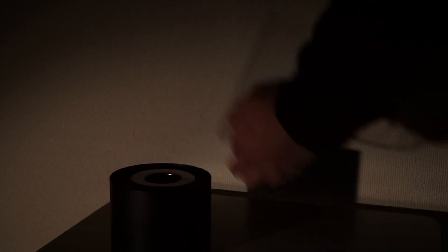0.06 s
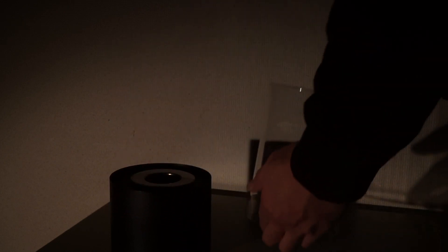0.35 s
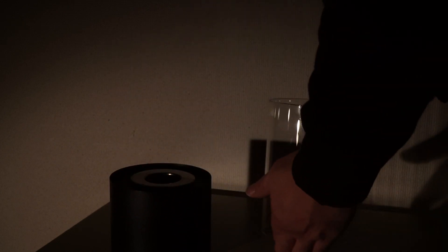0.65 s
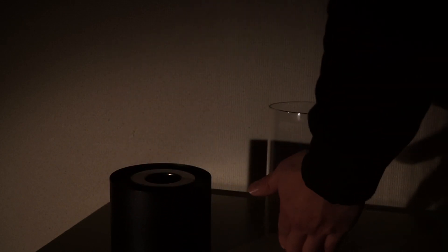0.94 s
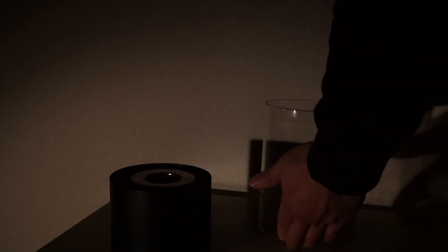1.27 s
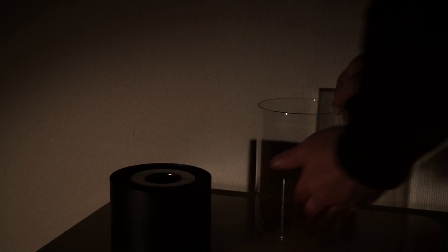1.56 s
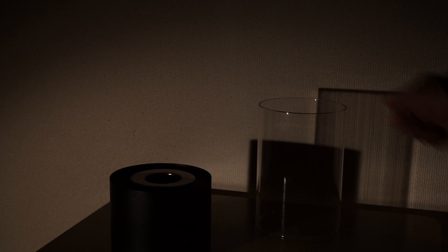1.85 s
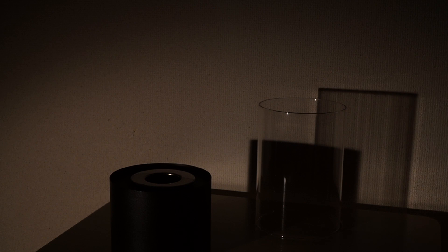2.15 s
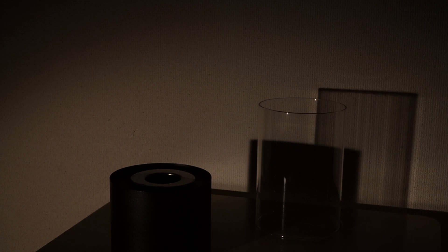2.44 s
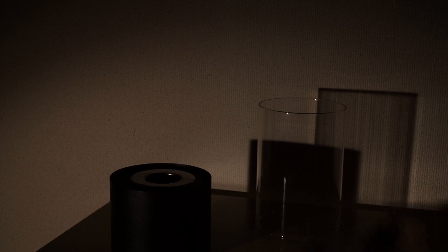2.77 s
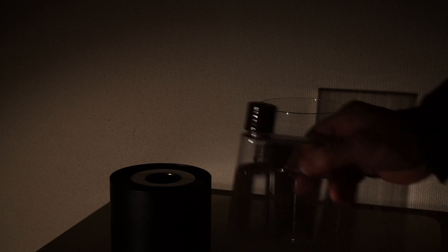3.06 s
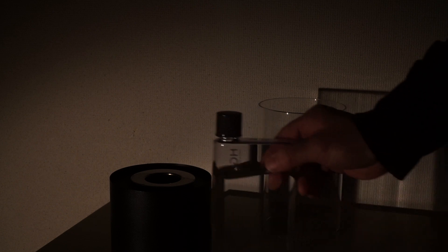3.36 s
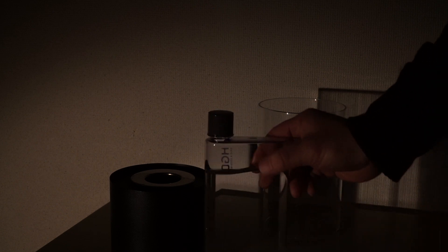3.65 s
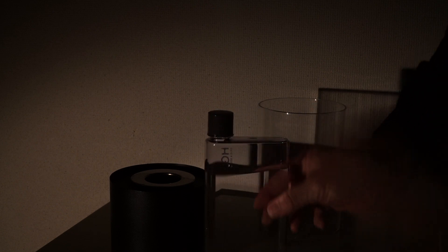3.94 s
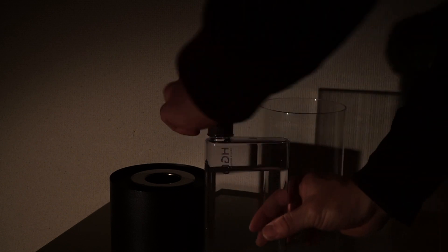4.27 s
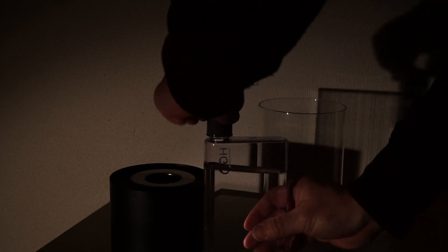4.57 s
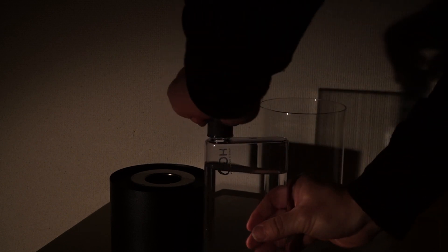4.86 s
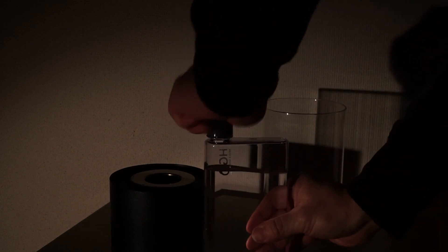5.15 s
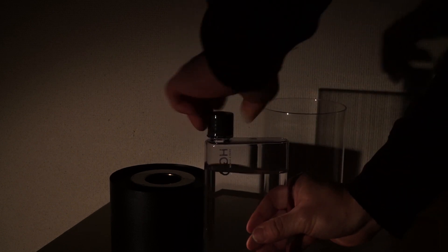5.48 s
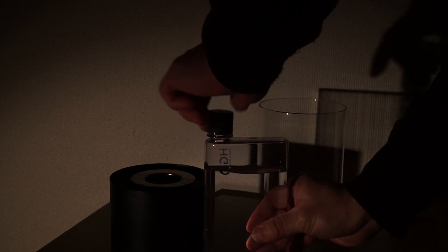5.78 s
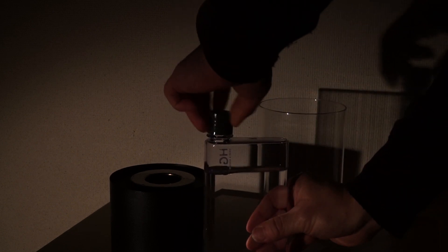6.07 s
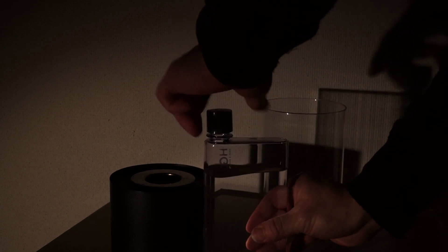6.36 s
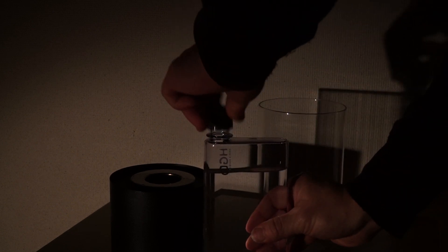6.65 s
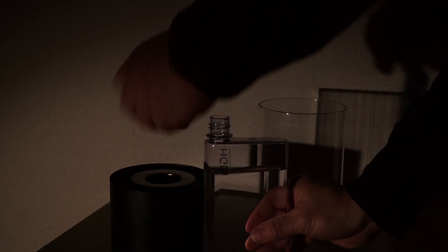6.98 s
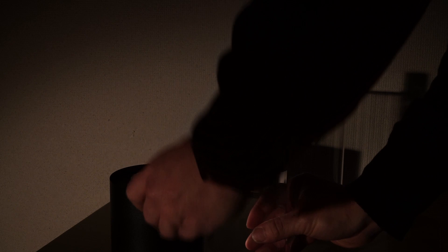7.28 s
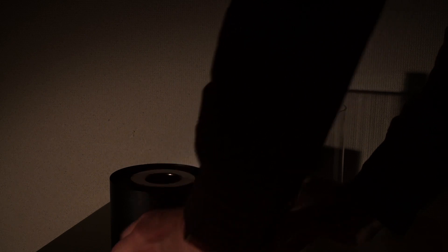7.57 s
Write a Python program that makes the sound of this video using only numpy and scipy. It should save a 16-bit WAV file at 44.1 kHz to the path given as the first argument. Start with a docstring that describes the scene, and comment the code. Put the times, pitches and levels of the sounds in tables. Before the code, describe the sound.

A glass is set on a table with sharp knocks, then a plastic bottle lands and its cap is cracked and unscrewed.

```python
"""A low hum fills a small room. A glass cylinder is set on a table in two knocks, its rim dragging
in between, and its thin wall sings faintly. A sleeve rustles, then a flat plastic bottle of liquid
is put beside the glass and rocks to rest. Fingers touch the cap, and the seal creaks and cracks.
Last, the cap is unscrewed in three rasping turns as its thread catches and slips."""
import sys
import numpy as np
from scipy import signal
from scipy.fft import rfft, irfft, next_fast_len
from scipy.io import wavfile
from scipy.ndimage import uniform_filter1d

SR = 44100
rng = np.random.default_rng(int(sys.argv[2]) if len(sys.argv) > 2 else 0)


def dump_mix(stems):
    """Bounce the given channels to the path in sys.argv[1] as a 16-bit WAV at rate SR."""
    frames = np.atleast_2d(stems).T  # one column per channel
    limited = np.clip(frames, -1, 1)  # hard clip at full scale
    pcm = np.round(limited * 32767).astype(np.int16)
    wavfile.write(sys.argv[1], SR, pcm)


N = 336042
TIME = np.arange(N) / SR
RESPONSE_SIZE = 2 ** 15
RESPONSE_HZ = np.fft.rfftfreq(RESPONSE_SIZE, 1 / SR)


def from_db(db):
    return 10 ** (np.asarray(db) / 20)


def unit_energy(x):
    return x / np.sqrt(np.sum(x ** 2))


def at_hz(points, hz):
    """Read between the rows of an (f/Hz, value) table, with octaves evenly spaced."""
    f, value = np.transpose(points)
    return np.interp(np.log(np.maximum(hz, 1)), np.log(f), value)


def left_right(mid, side):
    """Mid is what both ears share; side is how they differ."""
    return np.array([mid + side, mid - side])


def add(track, s, sound):
    """Mix a sound into a track from a given time on."""
    start = round(s * SR)
    track[start:start + len(sound)] += sound[:N - start]


def convolve(x, response):
    """Play a signal through an object or a room."""
    return signal.oaconvolve(np.atleast_2d(x), np.atleast_2d(response), axes=1)[:, :N]


def soften(force, hardness_hz):
    """A softer contact lasts longer and loses its treble above hardness_hz."""
    r = np.exp(-2 * np.pi * hardness_hz / SR)
    return signal.lfilter([(1 - r) ** 2], [1, -2 * r, r * r], force)


def blows(rows):
    """One short push for each contact."""
    force = np.zeros(N)
    for s, db, hardness_hz in rows:
        add(force, s, from_db(db) * soften(signal.unit_impulse(SR // 20), hardness_hz))
    return force


def rubs(rows, slips_per_s, uneven_db, fade_db=0):
    """Rubbing is a run of tiny uneven slips that may fade; its level counts all the slips together."""
    slipping = rng.random(N) < slips_per_s / SR
    slips = slipping * from_db(uneven_db * rng.uniform(-1.3, 1, N)) * rng.choice([-1, 1], N)
    force = np.zeros(N)
    for start, end, db, hardness_hz in rows:
        run = slips[round(start * SR):round(max(end, start + .01) * SR)] + 1e-9
        shape = signal.windows.tukey(len(run), .3) * from_db(np.linspace(0, -fade_db, len(run)))
        add(force, start, from_db(db) * soften(unit_energy(run * shape), hardness_hz))
    return force


def landing(event, edge_lead_s, rock_s, loss_db, far_edge_db, softer, count):
    """An edge touches, the base drops flat, then it rocks from edge to edge and settles."""
    s, db, hardness_hz = event
    edge = (s - edge_lead_s, db - 10.5, hardness_hz * 1.2)   # lighter and sharper than the base
    rocks = [(s + k * rock_s, db - k * loss_db + far_edge_db * (k % 2), hardness_hz * softer ** k)
             for k in range(count)]
    return blows([edge] + rocks)


def body(colour, notes):
    """How an object answers one tap: a broad tone colour with its own ringing notes on top."""
    f = RESPONSE_HZ
    cepstrum = irfft(np.log(from_db(at_hz(colour, f))))
    cepstrum[1:] *= 2 * (np.arange(1, RESPONSE_SIZE) < RESPONSE_SIZE // 2)   # no sound before the tap
    peaks = 1
    for hz, width, db in notes:
        # every note dies away quickly, so knocks and clicks sound short and dry
        width = max(width, hz / 55)
        peaks = peaks + (from_db(db) - 1) * 1j * f * width / (hz ** 2 - f ** 2 + 1j * f * width)
    return irfft(np.exp(rfft(cepstrum)) * peaks)


def noise(colour, side_colour):
    """Steady stereo noise, scaled by its strength above the bass."""
    size = next_fast_len(N, True)
    hz = np.fft.rfftfreq(size, 1 / SR)
    gain = from_db(at_hz(colour, hz))
    gain = gain / np.sqrt(np.mean(gain ** 2 * (hz > 300)))
    mid, side = rfft(rng.standard_normal((2, size))) * gain
    side = side * from_db(at_hz(side_colour, hz))
    return left_right(irfft(mid)[:N], irfft(side)[:N])


# tone colour of the room's hiss, and its side compared with its mid: f/Hz, level/dB
AIR_COLOUR = [(11, -40.5), (18, -26), (27, -14), (42, -8.5), (64, -6), (114, -5.5), (155, -20.5),
              (245, -21.5), (431, -26.5), (511, -27.5), (698, -30), (1070, -32.5), (1880, -34), (5690, -39),
              (15800, -43)]
AIR_SIDE = [(60, -38), (150, -9.5), (380, 0), (950, 3.5), (2380, 1.5), (5980, -0.5), (15000, -3)]
# the hum's tones: f/Hz, level/dB
HUM_TONES = [(59.2, -63), (80.7, -65.5), (107.7, -70), (129.2, -72.5)]
# how quickly each tone wavers: f/Hz
HUM_WAVER_HZ = [3, 15, 3.1, 3]

def room_hum():
    """Even hiss and a few low, wavering tones."""
    out = from_db(-63.5) * noise(AIR_COLOUR, AIR_SIDE)
    for (hz, db), waver_hz in zip(HUM_TONES, HUM_WAVER_HZ):
        drifts = rng.normal(0, 0.34, size=(2, 200))
        swell, phase = [np.interp(TIME * waver_hz, np.arange(len(d)), d) for d in drifts]
        out = out + np.sqrt(2) * from_db(db) * (1 + swell) * np.sin(2 * np.pi * (hz * TIME + phase))
    return out


# the glass's single knocks, and its base dropping flat: t/s, relative level/dB, hardness f/Hz
GLASS_KNOCKS = [(0.9645, -43, 2600), (1.1666, -9.5, 1210), (1.73, -37, 260)]
GLASS_LANDING = (1.5212, 0, 2040)
# its rim dragging: start t/s, end t/s, relative level/dB, hardness f/Hz
RIM_DRAGS = [(1.24, 1.48, -19.5, 289), (1.482, 1.516, -13, 476), (1.70, 1.75, -26.5, 423)]
# tone colour of glass on the table: f/Hz, level/dB
GLASS_COLOUR = [(40, -22), (70, -6), (110, -4), (150, 2), (175, -18.5), (202, 1.5), (250, 3), (330, 4.5),
                (470, 5.5), (700, 0), (1000, -6), (1500, -7), (2400, -11), (3800, -12.5), (6000, -19),
                (15000, -28)]
# notes the table rings with, under glass and bottle alike: f/Hz, least width/Hz, boost/dB
TABLE_NOTES = [(226, 33, 12), (287, 16, 5.5), (311, 27, 6.5), (356, 48, 2.5), (407.4, 16, 6.5),
               (541, 90, 6.5), (667, 6.2, 13.5), (710, 45, 10.5), (777, 32.8, 6), (908.5, 47, 13),
               (1086, 10, 0.5), (1138, 43, 19), (1216, 18, 11.5), (1332, 27.9, 3.5), (1515, 10, 2.5),
               (1578, 33, -1), (1648, 56, 11.5), (1853, 55, 11.5), (1830, 64, 8.5), (1990, 46, 14.5),
               (2039, 28, -8), (2370, 49, 9.5), (2330, 90, 9)]
TABLE_TOP_NOTE, RIM_NOTE = (233.3, 7.3, 14), (295, 25, 10)

def glass():
    """One edge lands, the rim sings as it drags, then the whole base drops flat."""
    force = blows(GLASS_KNOCKS) + landing(GLASS_LANDING, edge_lead_s=0.00223, rock_s=0.0112,
                                          loss_db=7.5, far_edge_db=2, softer=0.99, count=4)
    knocks = convolve(force, body(GLASS_COLOUR, [*TABLE_NOTES, TABLE_TOP_NOTE]))
    friction = rubs(RIM_DRAGS, slips_per_s=830, uneven_db=2.5)
    drag = convolve(friction, body(GLASS_COLOUR, [*TABLE_NOTES, RIM_NOTE]))
    return from_db(21) * (knocks + drag)


def ring(hz, db, fade_s):
    """One freely ringing note that drops 60 dB in fade_s."""
    t = TIME[:2 * SR]
    return from_db(db - 60 * t / fade_s) * np.sin(2 * np.pi * hz * t)


# fingers slipping on the glass: start t/s, end t/s, relative level/dB, hardness f/Hz
FINGER_SLIPS = [(1.475, 1.51, -54.5, 12000), (1.71, 1.76, -56, 12400)]
# high notes of the glass wall: f/Hz, relative level/dB, fade t/s
TINKLE_NOTES = [(2156, 3.5, 0.11), (3560, -1, 0.08), (4080, -8, 0.13), (5750, 1, 0.08)]

def glass_wall():
    """The thin wall tinkles under slipping fingers and sings faintly after the landing."""
    skin = rubs(FINGER_SLIPS, slips_per_s=780, uneven_db=8)
    tinkle = convolve(skin, sum(ring(*note) for note in TINKLE_NOTES))
    singing = np.zeros(N)
    for hz in (440, 440.65):   # the wall's lowest note is a close pair, so it slowly throbs
        add(singing, GLASS_LANDING[0], ring(hz, db=-54, fade_s=3.5) / 2)
    return singing + tinkle + from_db(18) * soften(skin, hardness_hz=6100)


def swells(rows):
    """A smooth rise and fall of level for each movement."""
    bumps = (from_db(db) * np.exp(-((TIME - s) / half_s) ** 2 / 2) for s, db, half_s in rows)
    return np.sqrt(sum(bump ** 2 for bump in bumps))


# slow arm movements, then two brief bright swishes: middle t/s, relative level/dB, half length t/s
ARM_MOVES = [(1.95, -65.5, 0.57), (2.55, -59, 0.18), (3.6, -62.5, 0.24), (4.22, -62, 0.33),
             (7.6, -66, 0.13)]
SWISHES = [(2.685, -60, 0.0062), (3.715, -55, 0.026)]
# tone colours of the brushing cloth and of the bright swishes: f/Hz, level/dB
SLEEVE_COLOUR = [(300, -2.5), (1000, 6.5), (2500, 10.5), (6000, 5.5), (12000, 3.5), (16000, -0.5)]
SWISH_COLOUR = [(500, -4), (2500, 4), (6000, -1), (9000, -1), (12500, 5), (16000, 1)]
# side compared with mid, for the cloth and also the room's echoes: f/Hz, level/dB
ROOM_SIDE = [(125, -33), (250, -25), (500, -20), (1000, -14.5), (2000, -9), (4000, -5.5), (10000, -2.5)]

def sleeve():
    """Cloth hisses softly as the arm moves, and two brief bright swishes rise above it."""
    brush_level = np.hypot(from_db(-80.5), swells(ARM_MOVES))   # never quite still
    brush = brush_level * noise(SLEEVE_COLOUR, ROOM_SIDE)
    swish = swells(SWISHES) * noise(SWISH_COLOUR, ROOM_SIDE)
    return (brush + swish) * from_db([[-1.2], [1.2]])   # a little to the right


# the bottle's single knocks, and its base dropping flat: t/s, relative level/dB, hardness f/Hz
BOTTLE_KNOCKS = [(2.537, -32.5, 3630), (4.60, -27, 202), (4.80, -26, 188), (5.041, -20, 417),
                 (5.205, -20.5, 350)]
BOTTLE_LANDING = (3.366, 0, 1220)
# its base sliding: start t/s, end t/s, relative level/dB, hardness f/Hz
BOTTLE_SLIDES = [(3.47, 3.56, -11.5, 233), (3.5, 3.9, -31, 746)]
# tone colour of the bottle on the table: f/Hz, level/dB
BOTTLE_COLOUR = [(40, -30), (65, -3.5), (125, -5.5), (172, -16.5), (205, -3.5), (265, -4.5), (400, 3.5),
                 (800, -4.5), (1500, -6), (2000, -7), (2800, -8), (3700, -4.5), (6000, -13.5), (15000, -19)]

def bottle():
    """The bottle is picked up, rocks and slides to rest on the table and is nudged as it is gripped."""
    force = blows(BOTTLE_KNOCKS) + landing(BOTTLE_LANDING, edge_lead_s=0.0038, rock_s=0.0172,
                                           loss_db=3.5, far_edge_db=-9.5, softer=0.87, count=5)
    force += rubs(BOTTLE_SLIDES, slips_per_s=610, uneven_db=-3)
    bottle_note = (402, 19, 3)   # f/Hz, width/Hz, boost/dB
    response = body(BOTTLE_COLOUR, [*TABLE_NOTES, TABLE_TOP_NOTE, bottle_note])
    return from_db(21.5) * convolve(force, response)


SEAT_DELAY_S, SEAT_HARDNESS_HZ = 0.00397, 2180   # a dull knock follows each tick as the cap seats
# fingers touching the cap: t/s, relative level/dB, hardness f/Hz
CAP_TOUCHES = [(4.535, -39.5, 4000), (4.858, -44, 7000)]
# the thread catching and slipping: t/s, length t/s, tick level/dB, rasp level/dB, tick hardness f/Hz
CAP_SLIPS = [(5.7134, 0.025, -30.5, -34, 4600), (5.7544, 0.011, -24.5, -26, 4260),
             (5.815, 0.009, -24.5, -34, 2780), (5.8724, 0.035, -20.5, -14, 3500),
             (6.1873, 0.0083, -21.5, -31, 7650), (6.261, 0.089, -20.5, -35, 3620),
             (6.3492, 0.04, -23.5, -16.5, 5700), (6.616, 0.013, -27.5, -23.5, 4180),
             (6.686, 0.0216, -48, -29.5, 2400), (6.7403, 0.022, -29.5, -22, 3140),
             (6.7708, 0.025, -22, -23, 5400), (6.805, 0.039, -24.5, -22.5, 3900)]
# tone colour of the cap and the plastic shell: f/Hz, level/dB
CAP_COLOUR = [(80, 3.5), (130, -7.5), (220, -1), (330, -5), (600, -1), (850, -3), (1300, -0.5),
              (2000, -2.5), (2800, -8.5), (4300, -3), (6200, -16), (8200, -10), (10500, -21), (15000, -17)]
# notes the shell rings with: f/Hz, least width/Hz, boost/dB
SHELL_NOTES = [(390, 32, 14), (540, 10.4, 10.2), (694, 32, 14.5), (949, 10.3, 11.6), (1104, 11, 12.5),
               (1385, 65, 13.1), (1800, 30, 8.8), (1928, 55, 13.3), (2150, 65, 8.3), (2520, 21, 7.9),
               (2850, 110, 8.6), (3220, 34, 3.4), (3300, 140, 5.8), (4020, 48, 7.2), (8240, 1900, 4.9)]
# the hand's grips: start t/s, relative level/dB, the note left freest (f/Hz, width/Hz, boost/dB)
GRIPS = [(0, -1, (1320, 180, 6.4)), (6.1, -2, (1140, 230, 3.4)), (6.3, -0.13, (2670, 1470, 11.6)),
         (6.55, -1.9, (10000, 1400, 7))]

def cap():
    """Fingers tap, then the thread ticks, seats and rasps; each grip colours the shell differently."""
    ticks, rasps = list(CAP_TOUCHES), []
    for s, length_s, tick_db, rasp_db, hardness_hz in CAP_SLIPS:
        ticks += [(s, tick_db, hardness_hz), (s + SEAT_DELAY_S, tick_db - 11, SEAT_HARDNESS_HZ)]
        rasps.append((s, s + length_s, rasp_db, hardness_hz * 0.79))   # duller than its tick
    force = blows(ticks) + rubs(rasps, slips_per_s=450, uneven_db=8, fade_db=5)
    grip_now = np.searchsorted([s for s, db, note in GRIPS[1:]], TIME)
    shell = sum(from_db(db) * convolve(force * (grip_now == k), body(CAP_COLOUR, [*SHELL_NOTES, note]))
                for k, (s, db, note) in enumerate(GRIPS))
    return from_db(19) * shell


# the seal's snap: t/s, relative level/dB, hardness f/Hz
SEAL_CRACK = [(5.2025, -21, 11900)]
# notes the seal rings with: f/Hz, width/Hz, boost/dB
SEAL_NOTES = [(1250, 2700, 8.3), (5400, 530, 3.7), (9240, 550, 20.6), (9900, 340, 7)]

def seal():
    """The seal creaks, lets go with a snap and a dull knock, and the loosened cap rubs on."""
    crack_s = SEAL_CRACK[0][0]
    creak = rubs([(crack_s - 0.014, crack_s, -22, 3500)], slips_per_s=1400, uneven_db=1)
    snap = blows([*SEAL_CRACK, (crack_s + SEAT_DELAY_S, -23, SEAT_HARDNESS_HZ)])
    freed = rubs([(crack_s, crack_s + 0.21, -29.5, 3080)], slips_per_s=1200, uneven_db=7, fade_db=4)
    return from_db(15) * convolve(creak + snap + freed, body(CAP_COLOUR, SEAL_NOTES))


# how long the echoes take to drop 60 dB, before they are evened out and shortened: f/Hz, t/s
ECHO_FADES = [(120, .3), (260, .24), (500, .17), (1000, .145), (2000, .15), (4000, .135), (10000, .12)]

def reflections(direct, wall, build_s, wall_delay_s=0.0112):
    """A short first burst, its bounce off the wall, and dense echoes that build up and die away."""
    t = TIME[:RESPONSE_SIZE]
    centres = np.log([hz for hz, fade_s in ECHO_FADES])
    white, echoes = rfft(rng.standard_normal(RESPONSE_SIZE)), 0
    for (hz, fade_s), pick in zip(ECHO_FADES, np.eye(len(centres))):
        band = irfft(white * np.interp(np.log(RESPONSE_HZ + 1), centres, pick))
        echoes = echoes + band * from_db(-60 * t / fade_s)
    burst = unit_energy(rng.standard_normal(RESPONSE_SIZE) * np.exp(-t / 0.00055))
    burst = burst - 0.57 * soften(burst, hardness_hz=5000)   # bass arrives mostly by echo
    response = unit_energy(echoes * (1 - np.exp(-t / build_s))) + direct * burst
    add(response, wall_delay_s, wall * burst[:SR // 20])
    for _ in range(3):   # even out the colour and shorten the tail
        spectrum = rfft(response)
        colour = np.sqrt(uniform_filter1d(abs(spectrum) ** 2, size=31))
        response = irfft(spectrum / colour) * np.exp(-(t / .17) ** 2)
    return response


# left ear compared with right: f/Hz, level/dB
BALANCE = [(150, -0.1), (500, -0.4), (1000, -1.7), (2000, -1.5), (4000, -1.1), (12000, -1.8)]

def room():
    """The table is near a wall and a little to the right; the ears differ mostly in the treble."""
    mid = reflections(direct=1.0, wall=0.3, build_s=0.0019)
    side = reflections(direct=0.55, wall=0.31, build_s=0.0015)
    side = signal.fftconvolve(side, body(ROOM_SIDE, []))[:RESPONSE_SIZE]
    shading = [body([(hz, sign * db / 2) for hz, db in BALANCE], []) for sign in (1, -1)]
    return signal.fftconvolve(left_right(mid, side), np.array(shading), axes=1)[:, :RESPONSE_SIZE]


def scene():
    """Glass, bottle, seal and cap echo in the room; the faint sounds are added without echo."""
    handling = convolve(glass() + bottle() + seal() + cap(), room())
    return handling + glass_wall() + sleeve() + room_hum()


def record(dry):
    """The very highest treble is cut steeply."""
    cutoff_hz = 15900
    return signal.sosfilt(signal.ellip(10, .1, 70, cutoff_hz, fs=SR, output="sos"), dry)


dry = scene()
out = record(dry)
dump_mix(out)
```